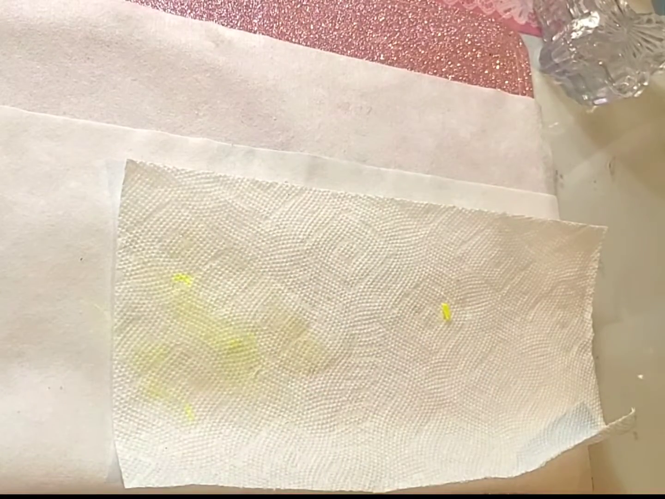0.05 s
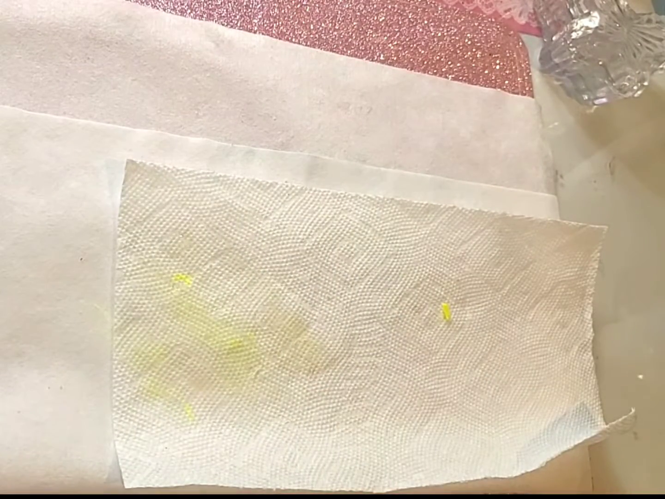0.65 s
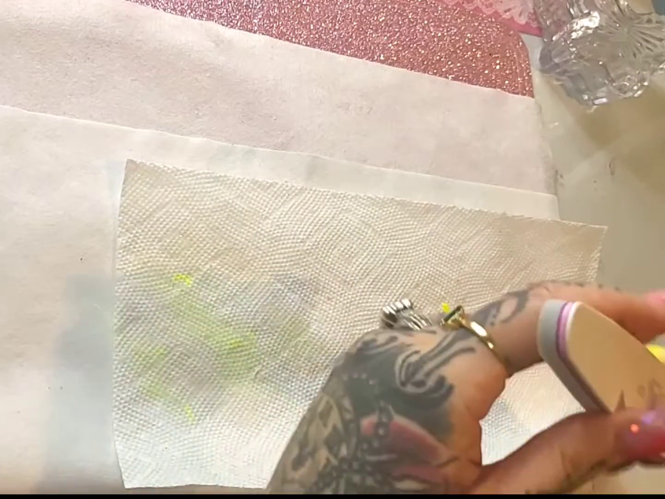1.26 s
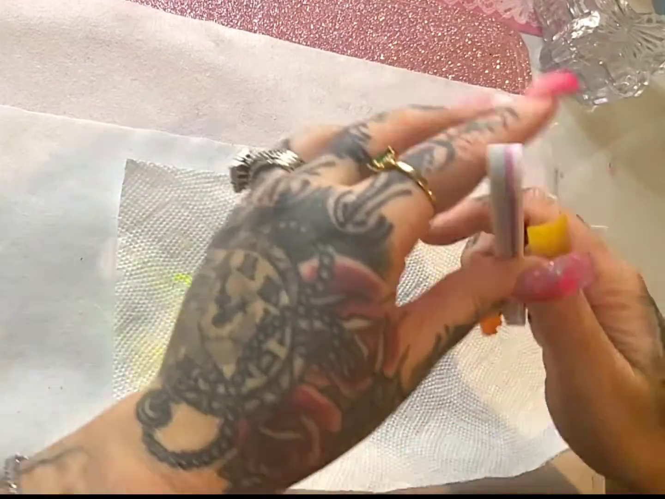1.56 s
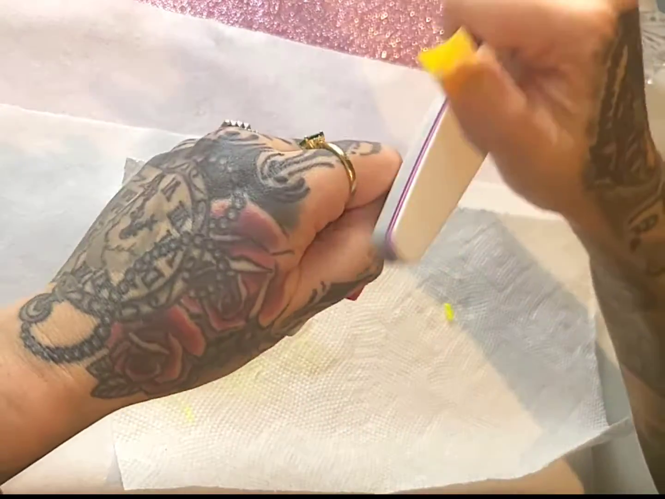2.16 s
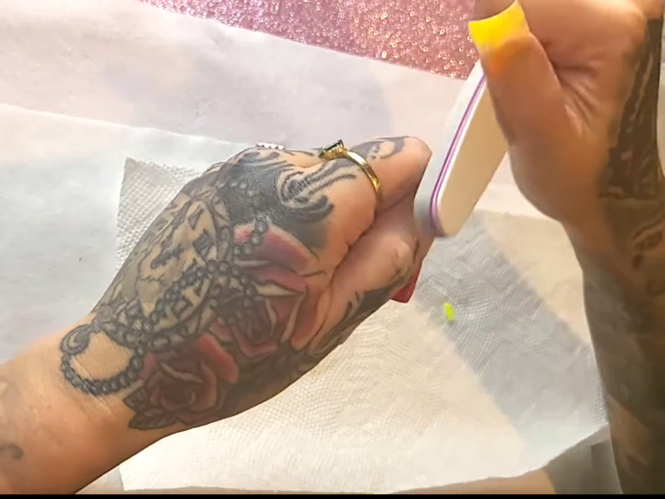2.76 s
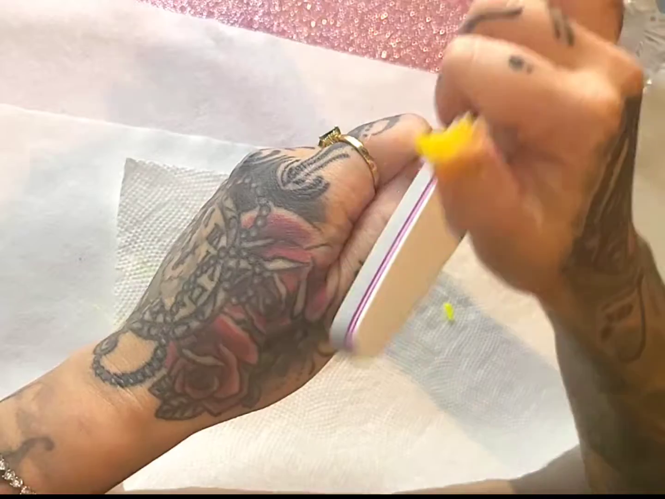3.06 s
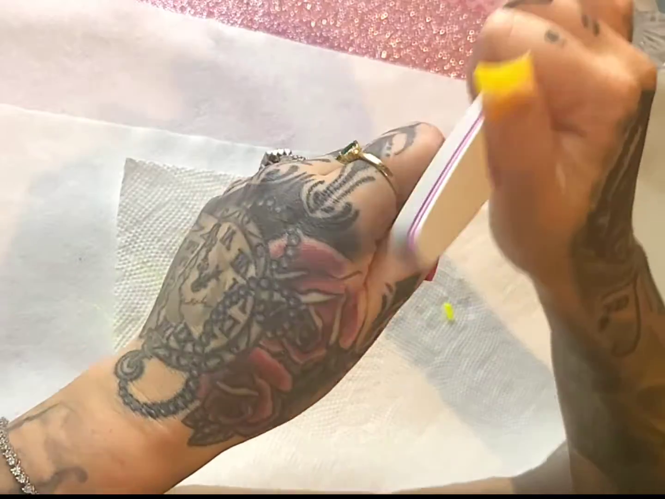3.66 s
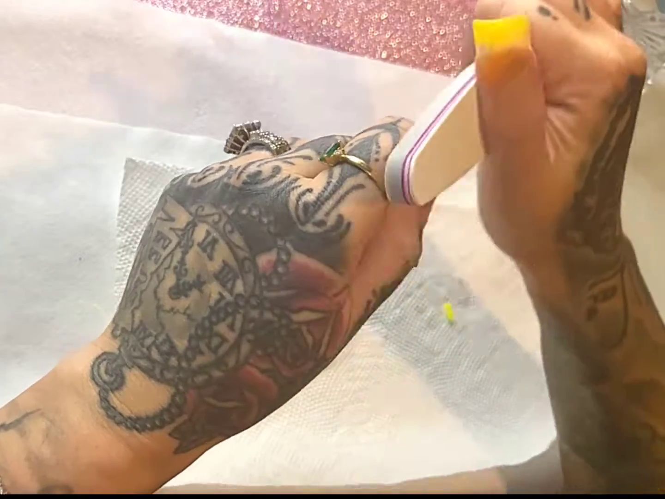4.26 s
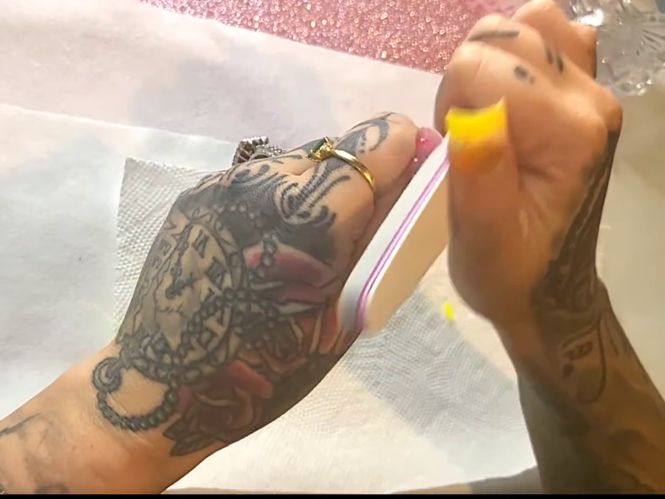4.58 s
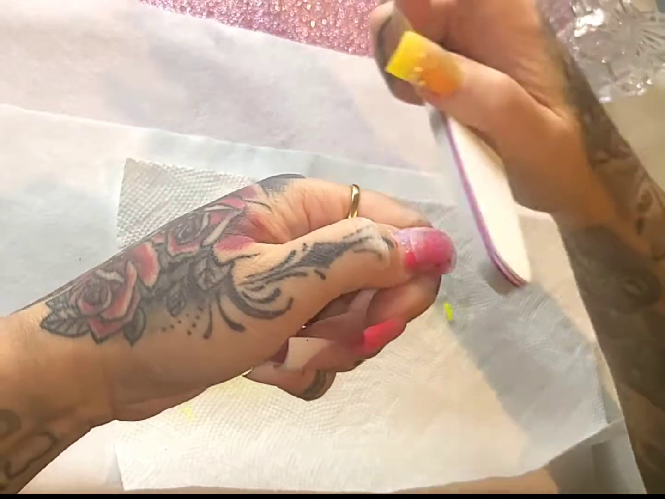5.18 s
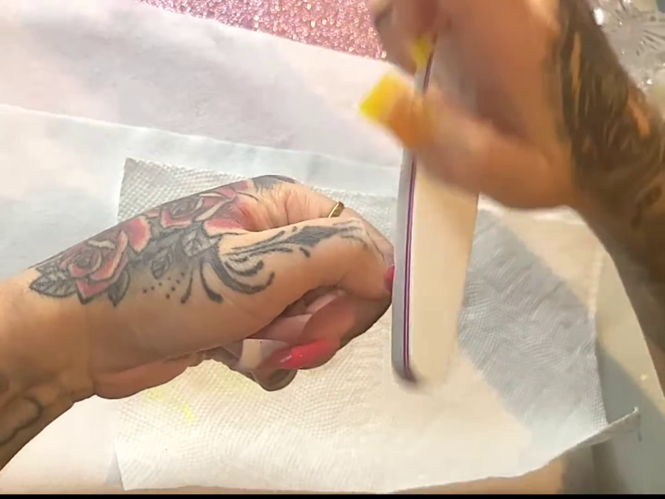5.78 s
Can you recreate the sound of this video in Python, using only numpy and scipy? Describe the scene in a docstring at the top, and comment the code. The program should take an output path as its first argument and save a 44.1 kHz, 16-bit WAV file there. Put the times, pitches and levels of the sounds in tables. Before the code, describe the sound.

A fan runs steadily in a small room. Hands softly brush and pick up a foam nail buffer, long nails ticking faintly on it. The buffer lands on a fingernail with a dull knock and a bright scratch, then rubs rapidly back and forth with a gritty, high rasp and a low rumble from the hands. After a brief pause, six more strokes follow, all close to the microphone.

```python
"""A fan runs in a small work room. Hands brush and pick up a foam-backed abrasive buffer; nails tick on it.
At 2.15 s it lands on a long nail with a knock and a bright scratch, then rubs to and fro, about nine
strokes a second. Grit catches on the nail and makes it ring; the hands rumble dully with the strokes,
and the arms bump the table while the grip settles. After a pause near 5 s, six more strokes follow."""
import sys
import numpy as np
from scipy import signal
from scipy.fft import rfft, irfft, next_fast_len
from scipy.io import wavfile
from scipy.ndimage import uniform_filter1d

SR = 44100
rng = np.random.default_rng(int(sys.argv[2]) if len(sys.argv) > 2 else 0)


def output_pcm(signal):
    """Save a mono or channel-first signal as 16-bit PCM at the path in sys.argv[1].

    Samples are clipped to [-1, 1] before scaling.
    """
    pcm = np.clip(np.atleast_2d(signal).T, -1, 1) * 32767
    wavfile.write(sys.argv[1], SR, np.round(pcm).astype(np.int16))


N = 265923
TIME = np.arange(N) / SR
FFT_SIZE = next_fast_len(N, real=True)
HZ = np.maximum(np.fft.rfftfreq(FFT_SIZE, 1 / SR), 1)

# strokes, from one turn of the hand to the next: start_s, level_db, pressure_slope_db_per_stroke
STROKES = [(2.147, -40, -5.5), (2.256, -40, 14.5), (2.367, -36, -0.5), (2.485, -31.5, -9), (2.59, -45, 8),
           (2.680, -42, 25.5), (2.805, -39.5, 7), (2.902, -35, -7), (3.009, -35, 3), (3.111, -37, 6),
           (3.215, -34, -2), (3.323, -39, 0), (3.432, -35.5, 5.5), (3.530, -41, 2), (3.635, -33.5, 5),
           (3.74, -33.5, 7), (3.852, -31.5, -8), (3.964, -32.5, -3.5), (4.068, -33.5, -1.5),
           (4.171, -37.5, 0), (4.272, -33, -1), (4.383, -36, -6.5), (4.485, -36.5, -6.5),
           (4.589, -34.5, -1), (4.69, -36, -8), (4.797, -32, -7), (4.901, -38, -16), (5.358, -41.5, 30.5),
           (5.510, -35.5, 4), (5.643, -40.5, 5), (5.758, -36.5, 6), (5.872, -40.5, 9.5), (5.984, -36.5, -4)]
# left-right likeness of sounds on the nail: freq_hz, correlation
NAIL_LIKENESS = [(1200, 0.43), (2000, 0.15), (3000, 1), (3900, 0.94), (5000, 0.7), (6500, 0.3),
                 (10000, 0.12), (15000, 0.26)]
# left-right likeness of fan and handling noise: freq_hz, correlation
BROAD_LIKENESS = [(60, 0.88), (290, 0.88), (640, 0.9), (1400, 0.57), (3000, 0), (15000, 0)]


def from_db(db):
    """Decibels to gain."""
    return 10 ** (np.asarray(db) / 20)


def unit_rms(x):
    """Scale to unit power."""
    return x / np.sqrt(np.mean(x ** 2) + 1e-20)


def by_hz(points):
    """Interpolate (freq_hz, value) rows on a log-frequency axis."""
    hz, value = np.transpose(points)
    return np.interp(np.log(HZ), np.log(hz), value)


def colour(x, gain):
    """Filter by a gain per frequency."""
    return irfft(rfft(x, FFT_SIZE) * gain, FFT_SIZE)[..., :N]


def resonances(modes):
    """Summed power response of (freq_hz, width_hz, level_db) modes."""
    return sum(from_db(db) ** 2 / (1 + ((HZ ** 2 - hz ** 2) / (HZ * width_hz)) ** 2)
               for hz, width_hz, db in modes)


def drift(rate_hz):
    """Slow random wander, rms 1."""
    coarse_s = TIME[::32]
    size = next_fast_len(len(coarse_s))
    hz = np.fft.rfftfreq(size, coarse_s[1])
    slow = irfft(rfft(rng.standard_normal(size)) / (1 + (hz / rate_hz) ** 2), size)
    return np.interp(TIME, coarse_s, unit_rms(slow[:len(coarse_s)]))


def stereo(pair, gain, likeness):
    """Colour two unrelated signals and blend them into partly alike channels, rms 1."""
    alike = np.clip(by_hz(likeness), -.99, .99)
    mid, side = colour(pair, gain * np.sqrt([1 + alike, 1 - alike]))
    return unit_rms(np.array([mid + side, mid - side]))


def stereo_noise(gain, likeness):
    """Coloured noise, rms 1."""
    return stereo(rng.standard_normal((2, N)), gain, likeness)


def split_bands(x, edges_hz):
    """Bands that sum to the whole, low to high."""
    spectrum = rfft(x.astype(np.float32), FFT_SIZE)
    lowpasses = [1 / (1 + (HZ / hz) ** 12) for hz in edges_hz]
    shares = np.diff(lowpasses, axis=0, prepend=0, append=1).astype(np.float32)
    return [irfft(spectrum * share, FFT_SIZE)[:, :N] for share in shares]


def burst(peak_s, decay_s, rise_s):
    """A force that builds quickly and dies away."""
    force = np.zeros(N)
    near = slice(*np.searchsorted(TIME, [peak_s - 10 * rise_s, peak_s + 10 * decay_s]))
    age_s = TIME[near] - peak_s
    force[near] = np.exp(-np.maximum(-age_s / rise_s, age_s / decay_s))
    return force


def grains(per_s, spread_db):
    """Grains catch at random, with uneven force."""
    sizes = from_db(spread_db * np.minimum(rng.exponential(1, N), 4))
    return (rng.random(N) < per_s / SR) * sizes * rng.standard_normal((2, N))


def stroke_motion(start_share=0.21, stop_share=0.42, creep=0.063, usual_db=-36):
    """The buffer speeds up, slides and slows to the next turn; before a pause it lifts off."""
    overlap_s, longest_s = 0.0061, 0.15
    speed, pressure_db, effort_db = np.zeros((3, N))
    turns_s = [start_s for start_s, _, _ in STROKES[1:]] + [np.inf]
    for (start_s, level_db, slope_db), turn_s in zip(STROKES, turns_s):
        end_s = min(turn_s + overlap_s, start_s + longest_s)
        on = (TIME >= start_s) & (TIME < end_s)
        progress = (TIME[on] - start_s) / (end_s - start_s)
        ramps = np.clip([progress / start_share, (1 - progress) / stop_share], 0, 1)
        speed[on] = creep + np.prod(np.sin(ramps * np.pi / 2) ** 2, axis=0)
        pressure_db[on] = level_db + slope_db * (np.clip(progress, .15, .8) - .45)
        effort_db[on] = level_db - usual_db
    return speed, pressure_db, effort_db


def stroke_tone(effort_db):
    """Rasp, edge and fizz gains in dB: light strokes hiss broadly, hard ones are mostly the nail's ring."""
    # band offsets: time_s, rasp_db, treble_db
    tone = [(2.2, 3, 7), (2.42, 4, 5), (2.53, 5, -0.5), (2.68, 4, -2.5), (3.2, 1, 2), (3.5, 3.5, -0.3),
            (3.82, -6, 0), (4.15, 0, -1), (4.85, 0, -2), (5.45, -2, -0.1), (5.7, 6, -1.3), (6.0, 1.5, -1)]
    time_s, rasp_points_db, treble_points_db = np.transpose(tone)
    treble_db = np.interp(TIME, time_s, treble_points_db)
    rasp_db = 9.5 + np.interp(TIME, time_s, rasp_points_db) - 0.38 * effort_db
    edge_db = 2.5 + 0.96 * treble_db - 0.48 * effort_db
    fizz_db = 4.0 + treble_db - 0.72 * effort_db
    return rasp_db, edge_db, fizz_db


def buffing(speed, pressure_db, effort_db, ring_db=1.0, chatter_db=0.58):
    """Grit on the ringing nail; the treble needs more speed, so it fades first at each turn."""
    # grit spectrum: freq_hz, density_db
    grit = [(710, -51), (1200, -22), (1670, -29.5), (1840, -28.5), (2190, -26.5), (3180, -9.5),
            (4020, -5.5), (5040, -1), (6240, -3), (7730, -5), (8790, -7.5), (9570, -6), (11100, -10.5),
            (14400, -10), (15500, -18)]
    # nail resonances: freq_hz, width_hz, level_db
    nail_modes = [(3000, 356, -47), (5020, 620, -2), (7690, 630, -0.5)]
    body = from_db(by_hz(grit)) * np.sqrt(1 + resonances(nail_modes)) / (1 + (900 / HZ) ** 4)
    scrape = stereo(grains(per_s=26000, spread_db=1.0), body, NAIL_LIKENESS)
    rasp, ring, edge, fizz = split_bands(scrape, edges_hz=(3000, 6000, 9000))
    rasp_db, edge_db, fizz_db = stroke_tone(effort_db)
    sound = (rasp * from_db(rasp_db) * speed ** 0.63
             + ring * from_db(ring_db) * speed ** 1.28
             + edge * from_db(edge_db) * speed ** 1.65
             + fizz * from_db(fizz_db) * speed ** 1.68)
    return sound * from_db(pressure_db + chatter_db * drift(rate_hz=60))


def contact_colour(x, spread_db=2.37, rate_hz=9):
    """The contact point travels over the nail, favouring one overtone, then another."""
    bands = split_bands(x, edges_hz=np.geomspace(2600, 13000, num=11))
    return sum(band * from_db(spread_db * drift(rate_hz)) for band in bands)


def snags(bite_delay_s=.015, bite_decay_s=0.019, bite_db=-3):
    """Coarse grit bites after each turn, most in strokes that start hard, and at snags; the nail rings."""
    # the buffer's edge snags on the nail: peak_s, level_db, decay_s
    edge_snags = [(2.528, -27, .012), (2.549, -27, 0.004), (3.347, -27.5, 0.019), (3.753, -34, 0.017),
                  (3.981, -31, 0.0089), (4.6, -34, 0.0069), (5.003, -29.5, 0.0025), (6.002, -39, 0.01)]
    bites = [(start_s + bite_delay_s, db + bite_db - 0.6 * slope_db, bite_decay_s)
             for start_s, db, slope_db in STROKES]
    force = sum(from_db(db) * burst(s, decay_s, rise_s=.0025) for s, db, decay_s in bites + edge_snags)
    body = np.sqrt(resonances([(3130, 480, -14.5), (5150, 510, 1), (6900, 800, -6)]))
    return force * stereo(grains(per_s=20000, spread_db=1.0), body, NAIL_LIKENESS)


def landing(level_db=-35):
    """The whole face of the grit meets the nail at once: a short, bright scratch."""
    spectrum_db = by_hz([(1000, -10), (3000, -10), (6000, 1), (10000, 5), (15000, -3)])
    body = from_db(spectrum_db) / (1 + (900 / HZ) ** 4)
    force = from_db(level_db) * burst(peak_s=2.157, decay_s=.006, rise_s=.0006)
    return force * stereo_noise(body, NAIL_LIKENESS)


def knocks():
    """The buffer lands or is pushed down; its core knocks dully."""
    # pushes: peak_s, level_db
    pushes = [(2.156, -38), (2.38, -59), (2.516, -37.5), (2.532, -46), (2.924, -44.5), (3.342, -42.5),
              (4.397, -47), (4.823, -47)]
    core_modes = [(172, 150, -1.0), (490, 350, 5.5), (870, 280, 1), (1340, 120, 5), (1850, 340, -36)]
    force = sum(from_db(db) * burst(s, decay_s=0.025, rise_s=0.0025) for s, db in pushes)
    return force * stereo_noise(np.sqrt(resonances(core_modes)), BROAD_LIKENESS)


def hand_rumble(speed, level_db=-46, smooth_s=0.061):
    """Rubbing shakes the hands and the table under them, which smooth over the turns."""
    # hand and table resonances: freq_hz, width_hz, level_db
    hand_modes = [(71, 30, -16), (146, 8, -9.5), (326, 1.8, 6.5), (406, 46, -4.5), (482, 8.9, -17),
                  (498.4, 9.1, 6), (550, 18, -9.5), (777, 150, -16), (1016, 55, -12.5)]
    drive = uniform_filter1d(speed, size=int(smooth_s * SR))
    return from_db(level_db) * drive * stereo_noise(np.sqrt(resonances(hand_modes)), BROAD_LIKENESS)


def table_thuds(pitch_hz=68, decay_s=0.035):
    """The arms bump the table while the grip settles."""
    # bumps: peak_s, level_db
    bumps = [(2.156, -55), (2.329, -52), (2.38, -47), (2.64, -52), (2.707, -47), (2.923, -49)]
    return sum(from_db(db) * burst(s, decay_s, decay_s / 2) * np.sin(2 * np.pi * pitch_hz * (TIME - s))
               for s, db in bumps)


def brushes(flutter_db=0.3, rise_share=0.9):
    """Soft touches swell and fade as a fine hiss, in which a nail rings faintly."""
    # touches of skin, paper and buffer: peak_s, level_db, decay_s, fizz_tilt_db
    touches = [(.005, -52, .045, -5.5), (0.587, -42.5, 0.029, -2), (1.138, -60, .014, -9),
               (1.185, -57.5, 0.014, -2), (1.24, -54.5, 0.046, -9.5), (1.285, -53.5, 0.012, -18),
               (1.406, -59, 0.042, -7), (1.563, -65, 0.066, -15), (1.695, -57.5, .028, -8),
               (1.901, -59, 0.014, -8), (2.003, -58, 0.024, -13), (5.178, -65, .035, -11)]
    hiss_db = by_hz([(1000, -19.5), (2800, -9.5), (4800, -7.5), (7500, -5), (11000, -1.5), (15000, -7.5)])
    body = from_db(hiss_db) * np.sqrt(1 + resonances([(4830, 210, 1.4)]))
    hiss = stereo(grains(per_s=15000, spread_db=2.0), body, BROAD_LIKENESS)
    hiss *= from_db(flutter_db * drift(rate_hz=70))
    low, high = split_bands(hiss, edges_hz=(8000,))
    out = np.zeros((2, N))
    for peak_s, db, decay_s, tilt_db in touches:
        age = (TIME - peak_s) / decay_s
        swell = np.exp(-np.where(age < 0, .5 * (age / rise_share) ** 2, age).clip(0, 30))
        out += swell * from_db(db) * (low * from_db(-tilt_db / 2) + high * from_db(tilt_db / 2))
    return out


def nail_ticks():
    """Long nails touch the buffer as it is taken up and ring briefly."""
    # touches: peak_s, level_db, decay_s
    touches = [(1.096, -65, 0.015), (1.127, -63, 0.034), (1.18, -66, .012), (1.248, -55, .006),
               (1.277, -61, .006), (1.403, -58, .008), (1.51, -62, .005), (1.692, -60, .005)]
    body = np.sqrt(resonances([(4550, 180, 0), (6800, 900, -13), (10000, 3000, -25)]))
    force = sum(from_db(db) * burst(s, decay_s, rise_s=.0006) for s, db, decay_s in touches)
    return force * stereo_noise(body, NAIL_LIKENESS)


def near_echoes(x, sway_s=.00012):
    """Add echoes off the nearest surfaces; their paths change as the hands move, shifting the colour."""
    # echoes off fingers, hand and table top: delay_s, gain
    echoes = [(.0011, 0.48), (.0026, 0.4), (.0043, .22)]
    out = x.copy()
    for delay_s, gain in echoes:
        for side in range(2):
            out[side] += gain * np.interp(TIME - delay_s - sway_s * drift(rate_hz=1.75), TIME, x[side])
    return out


def at_microphone(x, left_lead_s=0.0002):
    """Sound reaches the left port first; the housing shades each port differently."""
    # housing shade: freq_hz, left_minus_right_db
    port_shade = [(100, -1), (350, 1.5), (600, -0.5), (1000, -3), (1500, -2.5), (2600, 3.5), (3300, -0.5),
                  (4800, -0.5), (5600, -1.5), (6800, 0), (8000, -6.5), (9200, 0.5), (15000, -2)]
    lead = np.exp(2j * np.pi * HZ * left_lead_s * np.array([[1], [0]]))
    shade = from_db(by_hz(port_shade) * np.array([[.5], [-.5]]))
    return colour(x, lead * shade)


def room_tail(x, level_db=-11.5, t60_s=0.16, first_echo_s=0.0041):
    """A short diffuse tail, different at each port."""
    t = TIME[:SR // 2]
    tail = rng.standard_normal((2, len(t))) * from_db(-60 * t / t60_s) * (t > first_echo_s)
    return from_db(level_db) * signal.fftconvolve(x, unit_rms(tail) / np.sqrt(len(t)), axes=1)[:, :N]


def fan(level_db=-45.97):
    """Steady fan air noise, coloured by the room's resonances."""
    # air spectrum: freq_hz, density_db
    air = [(25, -28), (60, -18), (100, -15.5), (200, -11), (290, -11), (400, -6), (620, -13), (820, -14.5),
           (1100, -13.5), (1500, -22.5), (2200, -25.5), (4500, -38), (8000, -39.5), (15500, -46.5)]
    # room resonances: freq_hz, width_hz, level_db
    room_modes = [(67.3, 10, 9), (130.5, 10, 7.5), (164.3, 4.1, 10.5), (233.4, 19.5, 6.5),
                  (326.5, 6.3, 7.5), (388, 15.8, 10), (499, 18, 12), (559.5, 4.5, 13.5), (703, 40, 5),
                  (748.3, 41, 16), (828, 14, 11), (1028, 11, 9.5), (1810, 58, 10.5)]
    body = from_db(by_hz(air)) * np.sqrt(1 + resonances(room_modes))
    return from_db(level_db) * stereo_noise(body, BROAD_LIKENESS)


def scene():
    """Buffing and handling close to the microphone, over the fan."""
    speed, pressure_db, effort_db = stroke_motion()
    scrape = contact_colour(buffing(speed, pressure_db, effort_db))
    nail = near_echoes(scrape + snags())
    handling = hand_rumble(speed) + knocks() + table_thuds() + nail_ticks()
    close = at_microphone(nail + handling + landing()) + brushes()
    return close + room_tail(close) + at_microphone(fan())


def record(dry):
    """Steep low-pass."""
    cutoff_hz = 15700
    return signal.sosfilt(signal.ellip(12, .2, 80, cutoff_hz, fs=SR, output="sos"), dry)


dry = scene()
out = record(dry)
output_pcm(out)
```